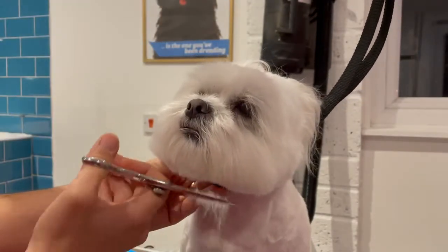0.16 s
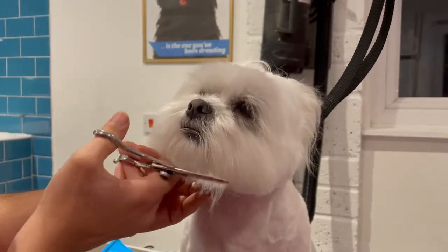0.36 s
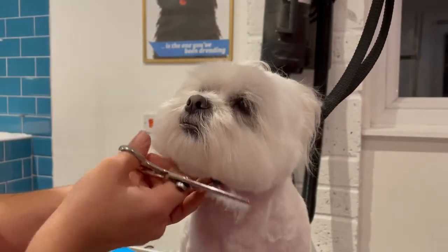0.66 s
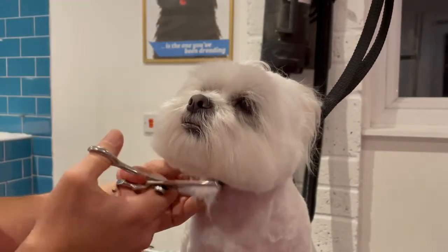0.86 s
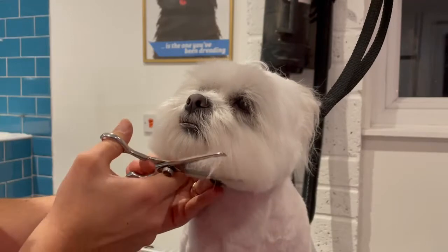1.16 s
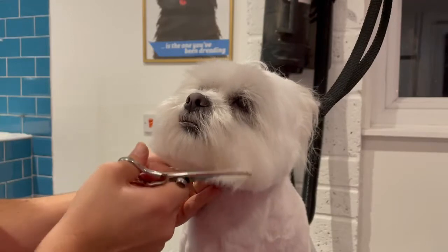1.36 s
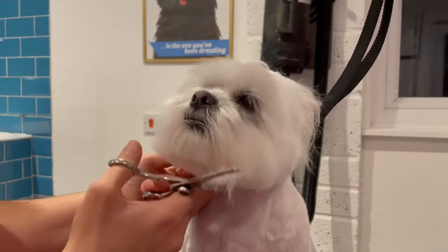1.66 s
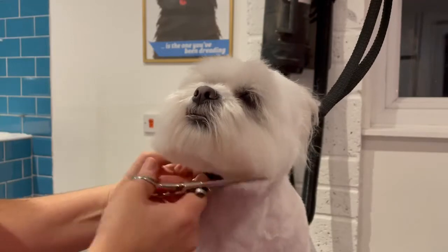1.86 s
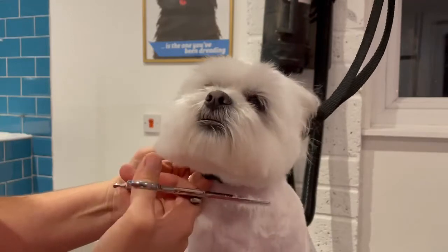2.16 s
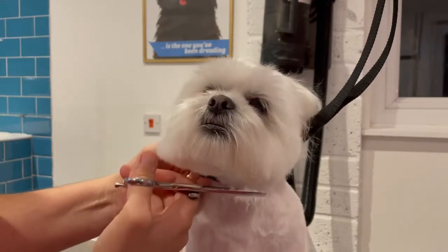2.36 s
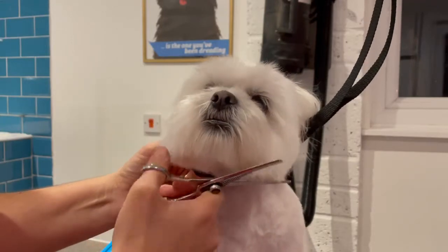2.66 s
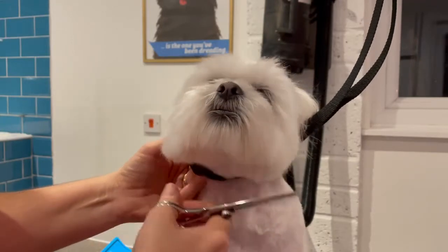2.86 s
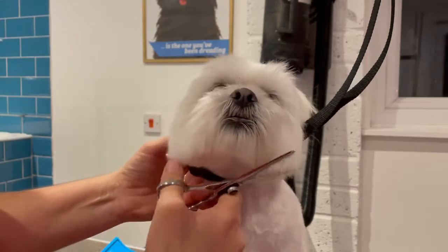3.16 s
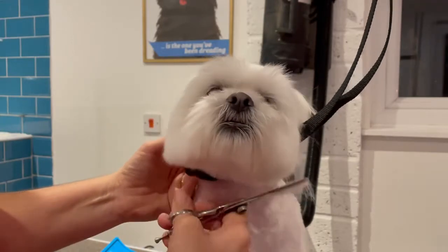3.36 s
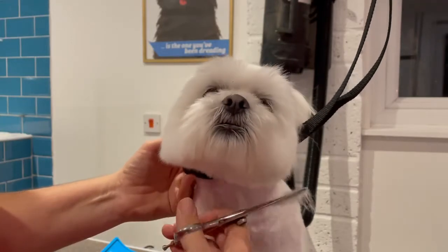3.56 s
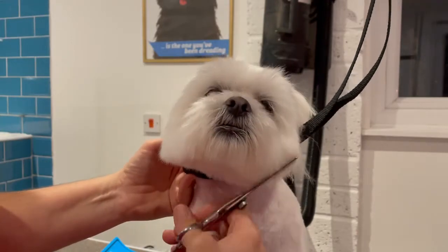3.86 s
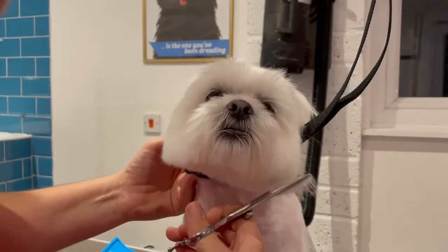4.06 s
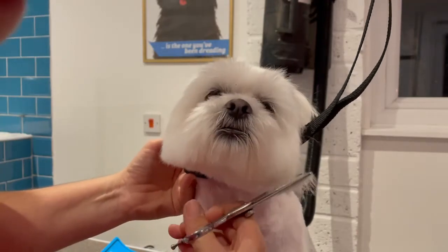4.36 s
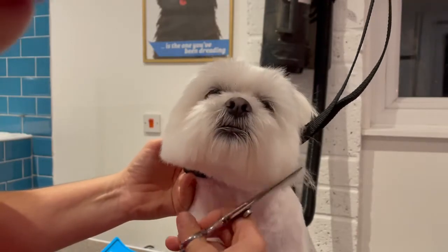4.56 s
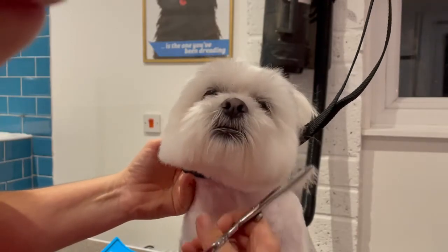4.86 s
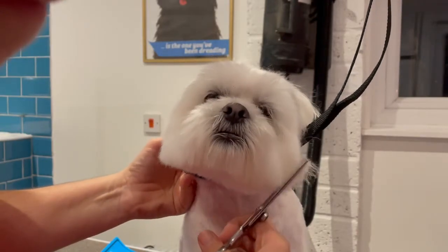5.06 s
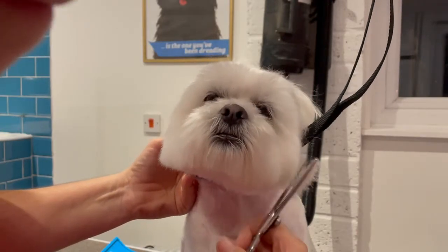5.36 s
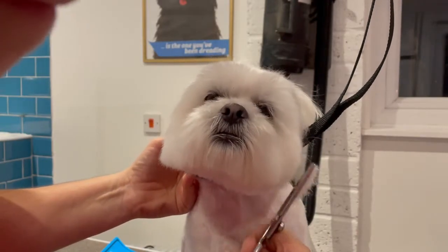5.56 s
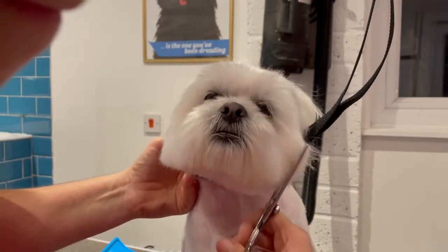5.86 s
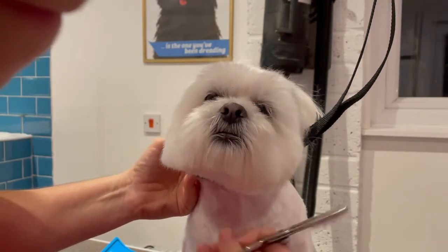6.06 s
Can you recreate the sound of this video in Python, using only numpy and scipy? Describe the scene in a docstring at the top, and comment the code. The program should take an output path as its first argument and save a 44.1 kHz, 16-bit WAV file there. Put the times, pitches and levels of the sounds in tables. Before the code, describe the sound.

Sharp, dry scissor cuts crunch through soft fur, each followed by a steely tick and rasp, over faint hand rustle and room hiss.

```python
"""Steel grooming scissors snip a small dog's chin close up: chattering, squealing edges over crackling hair.
Each cut is noise bursts and tiny fractures through blade resonances, shut by a falling noise thup. The blades
then unstick with a tick and rasp open in noise slips; a few steel ticks and clinks ring out. Soft bumps and one
sine blip pass, and hands rustle as filtered noise in the fur over rumble and hiss. A quiet tiled room adds a
decaying noise tail, and the two channels part in phase through the treble."""
import sys
import numpy as np
from scipy import signal
from scipy.fft import rfft, irfft
from scipy.io import wavfile
from scipy.ndimage import uniform_filter1d

SR = 44100
rng = np.random.default_rng(int(sys.argv[2]) if len(sys.argv) > 2 else 0)


def dump(signal):
    """Clip the signal to [-1, 1] and save it as 16-bit WAV at the path in sys.argv[1]."""
    limited = np.clip(np.atleast_2d(signal).T, -1, 1)
    pcm = np.round(limited * 32767).astype(np.int16)
    wavfile.write(sys.argv[1], SR, pcm)


N = 274302


def amp(db):
    """Turns decibels into gain."""
    return 10 ** (np.asarray(db) / 20)


def evened(x):
    """Scales to an rms of one."""
    return x / np.sqrt(np.mean(x ** 2) + 1e-20)


def read(points, hz):
    """Reads a table on a log-frequency axis."""
    f, value = np.transpose(points)
    return np.interp(np.log(hz + 1), np.log(f + 1), value)


def level(curve):
    """Gain over time from rows of t/s, level/dB."""
    return amp(np.interp(np.arange(N) / SR, *np.transpose(curve)))


def add(mix, s, sound):
    """Drops a sound into the mix at time s."""
    part = mix[max(round(s * SR), 0):][:len(sound)]
    part += sound[:len(part)]


def colour(x, points, size=4096):
    """Minimum-phase filter of unit energy: the table sets the shape of the spectrum, not its level."""
    log_gain = np.log(amp(read(points, abs(np.fft.fftfreq(size, 1 / SR)))))
    taps = np.fft.ifft(np.exp(np.conj(signal.hilbert(log_gain)))).real
    return signal.oaconvolve(x, taps / np.linalg.norm(taps))[:len(x)]


def resonate(x, hz, width):
    """A fixed or moving resonance that keeps the level of white noise."""
    turn = np.exp(2j * np.pi * np.cumsum(hz * np.ones(len(x))) / SR)
    r = np.exp(-np.pi * abs(width) / SR)
    # turn the resonance down to zero hertz, smooth there, turn it back up
    smooth = signal.lfilter([np.sqrt(2 * (1 - r * r))], [1, -r], x / turn)
    return (turn * smooth).real


def wobble(size, span):
    """Smooth random drift of rms one that changes over span samples."""
    return evened(uniform_filter1d(rng.standard_normal(size), max(int(span), 1)))


def under(envelope, texture):
    """Shapes a texture so that it carries the energy of its envelope."""
    shaped = envelope * texture
    return shaped * np.linalg.norm(envelope) / (np.linalg.norm(shaped) + 1e-20)


def peak(t, rise, fall):
    """An envelope that climbs to one at t = 0 and dies away."""
    return np.exp(np.minimum(t / rise, -t / fall))


def crackle(size, per_s, spread_db):
    """Random tiny fractures of uneven strength, rms one."""
    strength = amp(spread_db * np.minimum(rng.exponential(1, size), 3))
    sign = rng.choice([-1, 1], size)
    return evened(strength * sign * (rng.random(size) < per_s / SR))


def chatter(per_s, slip_s, jitter, drag):
    """Stick and slip of edge on edge: uneven short noise bursts over a steady drag."""
    size = len(per_s)
    turns = np.cumsum(per_s * np.exp(jitter * wobble(size=size, span=177))) / SR
    strength = amp(2 * rng.standard_normal(size))[turns.astype(int)]  # one strength for each slip
    slips = strength * np.exp(-abs(turns % 1 - .5) / (per_s * slip_s))
    return evened((drag + slips) * rng.standard_normal(size))


# Spectral shapes of fur, handling, room rumble and hiss: f/Hz, level/dB
FUR_SPECTRUM = [(100, -14), (280, -6), (500, -6.5), (1000, -2), (2300, 1.5), (3500, -4.5), (5500, -5),
                (9000, -5), (13000, -4.5), (16000, 1.5)]
HANDS_SPECTRUM = [(25, -34), (70, 4), (130, 5), (300, -4), (600, -6.5), (1200, -12.5), (2500, -19.5),
                  (5000, -34), (16000, -62)]
RUMBLE_SPECTRUM = [(20, -56.5), (33, -18.5), (47, 2), (58, -4.5), (80, -9.5), (130, -24), (300, -54.5),
                   (2000, -65)]
HISS_SPECTRUM = [(30, -5), (170, 19.5), (400, 9), (1200, 7.5), (3000, -5), (7000, -12.5), (12000, -1.5),
                 (16000, -26)]
# Level of the low rumble over time, which the steady handling follows: t/s, level/dB
RUMBLE_LEVEL = [(0, -78.5), (1.3, -71), (2.1, -64), (2.7, -60), (3.3, -57), (4.2, -60.5), (6.22, -60)]
# The hands shift their hold on the dog: middle t/s, half length/s, fur brushing level/dB, dull handling level/dB
HAND_SHIFTS = [(0.066, 0.2, -51.5, -62), (0.413, 0.14, -63, -101), (0.747, 0.088, -61.5, -92),
               (1.0, 0.1, -62.5, -80), (2.007, 0.11, -64.5, -72), (2.43, .15, -92, -62),
               (4.924, 0.21, -63, -64), (6.1, 0.095, -52, -59.5)]
FUR_REST_DB, FUR_UNEVEN_DB, HISS_DB = -71, 3, -74  # resting fur, its unevenness, hiss
STRANDS_DB, STRANDS_PER_S, STRAND_SPREAD_DB = -9, 400, 4  # single strands flick; level re the fur
HOLD_DB, FIDGET_DB = -6, 2.5  # steady handling re the rumble, and the unevenness of all handling
SWISH_DB, RUB_DB = -10.5, -3.5  # thin swish and hollow rub of a shift, re its dull handling


def noise_pair(points, apart):
    """Two channels of coloured noise: a shared part, and a part of opposite sign that widens it."""
    shared, own = (colour(rng.standard_normal(N), points) for _ in range(2))
    return evened(np.array([shared + apart * own, shared - apart * own]))


def background():
    """Each shift of the hands brushes fur and rustles dully, over steady handling noise, room rumble and hiss."""
    t, brush, handle = np.arange(N) / SR, np.zeros(N), np.zeros(N)
    for s, half, fur_db, hand_db in HAND_SHIFTS:
        move = np.exp(-((t - s) / half) ** 2)
        brush += amp(fur_db) * move
        handle += amp(hand_db) * move
    low = level(RUMBLE_LEVEL)
    fidget = amp(FIDGET_DB * wobble(size=N, span=1400))
    strands = colour(crackle(size=N, per_s=STRANDS_PER_S, spread_db=STRAND_SPREAD_DB), FUR_SPECTRUM)
    fur = noise_pair(FUR_SPECTRUM, apart=0.78) + amp(STRANDS_DB) * strands
    rest = amp(FUR_REST_DB + FUR_UNEVEN_DB * wobble(size=N, span=1300))
    fur = fur * np.hypot(brush, rest)
    swish = resonate(rng.standard_normal(N), hz=2420, width=320) * handle * amp(SWISH_DB)
    rub = resonate(rng.standard_normal(N), hz=300, width=150) * handle * fidget * amp(RUB_DB)
    hands = noise_pair(HANDS_SPECTRUM, apart=0.46) * np.hypot(handle, low * amp(HOLD_DB)) * fidget
    rumble = noise_pair(RUMBLE_SPECTRUM, apart=0.065) * low
    hiss = noise_pair(HISS_SPECTRUM, apart=0.55) * amp(HISS_DB)
    return fur + swish + rub + hands + rumble + hiss


# Time each band of the room takes to die by 60 dB: f/Hz, decay/s
ROOM_DECAY = [(200, 0.28), (1000, 0.42), (3500, 0.4), (8000, 0.39), (15000, 0.37)]
# Tone of the tail, before its overall level is set: f/Hz, level/dB
ROOM_TONE = [(120, 1), (500, 13), (2600, 6.5), (3600, -7.5), (4600, 8), (7000, 8.5), (11000, 5),
             (15000, -4)]


def room(x, wet_db, early_db):
    """Near reflections from dog and hands, then a tail in which each band dies at its own speed."""
    size = SR * 3 // 4
    taps = rng.standard_normal((2, size)) * (rng.random((2, size)) < .15)  # sparse echoes
    hz, t, z = signal.stft(taps, SR, nperseg=256)
    tail_db = read(ROOM_TONE, hz)[:, None] - 60 * t / read(ROOM_DECAY, hz)[:, None]
    tail = signal.istft(z * amp(tail_db), SR, nperseg=256)[1][:, :size]
    t = np.arange(size) / SR
    tail = tail * (1 - np.exp(-t / 0.00026))
    early = rng.standard_normal((2, size)) * np.exp(-t / 0.002) * (1 - np.exp(-t / 0.00014))
    echo = np.zeros((2, size))
    for db, part in [(wet_db, tail), (early_db, early)]:
        echo += amp(db) * part / np.linalg.norm(part, axis=1, keepdims=True)
    return signal.fftconvolve(x[None], echo, axes=1)[:, :N]


BLIP_S, BLIP_DB, BLIP_DECAY_S = 1.2465, -47, .009
BLIP_FROM_HZ, BLIP_TO_HZ, BLIP_GLIDE_S = 1200, 130, .0035


def blip():
    """A soft, quickly damped sine blip whose pitch drops at once."""
    t = np.arange(SR // 10) / SR
    hz = BLIP_TO_HZ + (BLIP_FROM_HZ - BLIP_TO_HZ) * np.exp(-t / BLIP_GLIDE_S)
    tone = np.sin(2 * np.pi * np.cumsum(hz) / SR)
    out = np.zeros(N)
    add(out, BLIP_S, amp(BLIP_DB) * np.exp(-t / BLIP_DECAY_S) * tone)
    return out


# Soft bumps of hand and handles: t/s, level/dB, decay/s, upper edge f/Hz
HAND_BUMPS = [(.535, -52, 0.0024, 930), (2.738, -57, 0.029, 750), (3.255, -55, 0.012, 700),
              (3.986, -48.5, 0.012, 167), (4.908, -45, 0.009, 247), (4.986, -38.5, 0.0022, 2780),
              (4.991, -48, 0.018, 910), (6.130, -54.5, 0.039, 780), (6.160, -46, 0.032, 185)]


def bumps():
    """Dull, damped knocks of the hands and the padded handles: band-limited noise that dies fast."""
    out, t = np.zeros(N), np.arange(SR // 4) / SR
    for s, db, decay, edge_hz in HAND_BUMPS:
        band = [70, np.clip(edge_hz, 100, 9000)]
        dull_band = signal.butter(2, band, "band", fs=SR, output="sos")
        dull = evened(signal.sosfilt(dull_band, rng.standard_normal(len(t))))
        add(out, s, amp(db) * dull * np.exp(-t / decay) * (1 - np.exp(-t / 0.00069)))
    return out


# Light metal-on-metal clinks: t/s, level/dB (drives both ring and strike)
STEEL_CLINKS = [(1.999, -65), (2.204, -62.5), (2.405, -66.5), (2.756, -63), (3.139, -68), (4.102, -67.5),
                (4.615, -66), (4.987, -68.5), (5.56, -64)]
# Modes the loose steel rings with: f/Hz, level/dB, width/Hz
STEEL_MODES = [(2428, -12, 55), (4490, -4.5, 130), (5340, -12, 140), (5720, -6, 210), (6440, -11, 250),
               (9180, -2, 160), (9350, 1.5, 680)]
CONTACT_S, STRIKE_S = 0.0063, 0.0013  # decays of the rattling contact and of its first strike
RING_DB, STRIKE_DB = -5, 17.5  # gains of ring and strike


def clinks():
    """A sharp strike and a short rattling contact set damped steel ringing, a little differently each time."""
    out, t = np.zeros(N), np.arange(SR // 3) / SR
    for s, db in STEEL_CLINKS:
        rattle, grit = rng.standard_normal((2, len(t)))
        contact = np.exp(-t / CONTACT_S) * rattle
        ring = np.zeros(len(t))
        for hz, mode_db, width in STEEL_MODES:
            mode = resonate(resonate(contact, hz, width), hz, 1500)
            ring += amp(mode_db) * evened(mode)
        strike = amp(STRIKE_DB) * resonate(np.exp(-t / STRIKE_S) * grit, hz=7160, width=5300)
        add(out, s, amp(db) * (amp(RING_DB) * ring + strike))
    return out


# Opening strokes, a tick and then a rasp: t/s, tick level/dB, pause/s, rasp length/s, rasp level/dB
OPENING_STROKES = [(.742, -29.5, 0.018, 0.052, -43.5), (1.477, -40, 0.0043, 0.086, -47.5),
                   (1.956, -31.5, 0.01, 0.073, -45.5), (2.895, -28.5, 0.013, 0.064, -44),
                   (3.434, -28, 0.014, 0.065, -45), (3.97, -32, 0.001, 0.034, -41),
                   (4.683, -26, .014, 0.053, -42.5), (5.139, -31.5, 0.012, 0.019, -34),
                   (5.636, -28.5, 0.0041, 0.07, -43), (6.042, -29.5, 0.021, 0.089, -50)]
# Sharp ticks of steel catching on steel: t/s, level/dB, decay/s
STEEL_TICKS = [(0.537, -28, 0.00067), (1.016, -38.5, 0.00047), (3.427, -39, 0.0013), (3.715, -30, 0.0011),
               (3.9733, -25, 0.0011), (4.6917, -19, 0.0005), (4.911, -37, 0.00088),
               (4.9876, -18.5, 0.00038), (6.056, -26, 0.0013), (6.126, -25, 0.00054)]
# Spectral shape of bare edges rubbing: f/Hz, level/dB
EDGE_SPECTRUM = [(300, -23.5), (2000, -34.5), (3500, -28), (5500, -15.5), (8500, -2.5), (10200, -1.5),
                 (12500, -0.5), (14100, -8), (15200, -15), (16000, 6)]
LEAD_IN_DB, LEAD_IN_SLIPS_PER_S, SPEED_UP_S = -46.5, 380, .08  # slip rate reached at the end of the lead-in
UNSTICK_RISE_S, UNSTICK_DECAY_S, TICK_BODY_DB = 0.0013, 0.001, -25  # body: ring of the blades in a tick
SLIPS_PER_S, SLIPS_SLOW_S, SCRAPE_S = 300, 0.082, 0.028
SQUEAK_DB, SQUEAK_HZ, SQUEAK_CLIMB_HZ, SQUEAK_CLIMB_S = -3, 10060, 1220, 0.011  # level re the rasp's slips
RASP_RING_DB, RASP_RING_HZ = -22, 6000  # the blades ring under the rasp


def edges():
    """Bare edges rub before each cut; on opening they unstick with a tick and rasp in slips that slow down."""
    rub, whine, t = np.zeros(N), np.zeros(N), np.arange(SR // 8) / SR
    before = t - t[-1]
    for s, _, lead_s, *_ in CLOSING_STROKES:
        rate = LEAD_IN_SLIPS_PER_S * np.exp(before / SPEED_UP_S)
        slips = chatter(rate, slip_s=.0007, jitter=.15, drag=.15)
        lead = under(amp(LEAD_IN_DB) * np.exp(before / lead_s), slips)
        add(rub, s + 0.0019 - t[-1], resonate(lead, hz=15000, width=13000))
    t = t - .015  # room for the attacks before t = 0
    for s, tick_db, pause, length, db in OPENING_STROKES:
        tick = amp(tick_db) * peak(t, UNSTICK_RISE_S, UNSTICK_DECAY_S)
        add(rub, s + t[0], under(tick, rng.standard_normal(len(t))))
        force = amp(db) * (1 + np.tanh(t / 0.004)) / 2 * np.exp(-2 * (t / length) ** 2)
        # a steady scrape at first, breaking into separate slips
        rate = SLIPS_PER_S * np.exp(-t / SLIPS_SLOW_S)
        slips = chatter(rate, slip_s=.0006, jitter=.22, drag=.15 + .6 * np.exp(-t / SCRAPE_S))
        # the squeak climbs as the blades open
        squeak_hz = SQUEAK_HZ + SQUEAK_CLIMB_HZ * np.tanh((t / SQUEAK_CLIMB_S) ** 2)
        squeak = resonate(slips, squeak_hz * rng.uniform(.98, 1.04), width=350)
        start = s + pause + t[0]
        add(rub, start, under(force, slips + amp(SQUEAK_DB) * squeak))
        add(whine, start, under(amp(-6) * force, resonate(slips, hz=15300, width=700)))
        add(whine, start, under(amp(RASP_RING_DB) * force, resonate(slips, RASP_RING_HZ, width=800)))
    for s, db, decay in STEEL_TICKS:
        tick = under(amp(db) * peak(t, decay / 2, decay), rng.standard_normal(len(t)))
        add(rub, s + t[0], tick)
        add(whine, s + t[0], amp(TICK_BODY_DB) * resonate(tick, hz=5100, width=430))
    return colour(rub, EDGE_SPECTRUM) + whine


THUP_LEAD_S, THUP_RISE_S, THUP_FALL_S = 0.0056, 0.011, 0.0078  # lead: peak of the thup before the stroke's end
THUP_END_SHARE, THUP_GLIDE_S = 0.65, 0.0017  # the pitch falls to this share of its start
FLEX_DB, HUM_DB, HUM_DECAY_S = -2.5, -9, 0.056  # levels re thup
GRIP_DB, GRIP_DELAY_S = -2.5, .008  # level re thup


def thups():
    """The blades shut with a falling thup, flex and hum on; the hand takes up the handles a moment later."""
    out, t = np.zeros(N), np.arange(SR // 4) / SR - .07  # t = 0 at the end of the stroke
    for s, length, *_, db, hz in CLOSING_STROKES:
        start = s + length + t[0]
        press = amp(db) * peak(t + THUP_LEAD_S, THUP_RISE_S, THUP_FALL_S) * (t > -length)
        fall = THUP_END_SHARE + (1 - THUP_END_SHARE) * (1 - np.tanh(t / THUP_GLIDE_S / 2)) / 2
        decay = np.exp(-np.maximum(t, 0) / HUM_DECAY_S)
        linger = amp(db + HUM_DB) * decay * (1 + np.tanh(t / 0.0018)) / 2
        thup, flex, hum, grip = rng.standard_normal((4, len(t)))
        add(out, start, under(press, resonate(thup, hz * fall, width=163)))
        add(out, start, under(amp(FLEX_DB) * press, resonate(flex, hz=3500, width=600)))
        uneven_hum = resonate(hum, hz=3620, width=420) * amp(3 * wobble(size=len(t), span=400))
        add(out, start, under(linger, uneven_hum))
        add(out, start + GRIP_DELAY_S, under(amp(GRIP_DB) * press, resonate(grip, hz=274, width=420)))
    return out


# Squeals of the edges as they meet the hair: t/s, level/dB
EDGE_SQUEALS = [(.498, -53), (1.757, -41), (2.716, -41.5), (3.222, -37), (3.749, -39.5), (4.940, -39),
                (5.439, -43), (5.831, -43)]
SQUEAL_HZ, SQUEAL_CLIMB_HZ, SQUEAL_SAG_HZ = 11200, 1650, 750  # base pitch, climb above it, final sag below it
SQUEAL_TOP_S, SQUEAL_JITTER_HZ = .0095, 480  # top: how long before the hair the climb peaks, and its width
SQUEAL_RISE_S, SQUEAL_FALL_S = 0.0043, 0.0048
SQUEAL_CHATTER_DB, SQUEAL_CHATTER_S = -17.5, 0.025  # lead-in re the squeal, and its rise


def squeals():
    """Edge on edge: thin chatter climbs in pitch as the blades speed up, then swoops down as they meet the hair."""
    out, t = np.zeros(N), np.arange(SR // 8) / SR - .09  # t = 0 at the hair
    climb = SQUEAL_CLIMB_HZ * np.exp(-((t + SQUEAL_TOP_S) / SQUEAL_TOP_S) ** 2)
    sag = SQUEAL_SAG_HZ * (1 + np.tanh(t / .004)) / 2
    hz = SQUEAL_HZ + climb - sag
    force = peak(t, SQUEAL_RISE_S, SQUEAL_FALL_S)
    force = force + amp(SQUEAL_CHATTER_DB) * peak(t, SQUEAL_CHATTER_S, SQUEAL_FALL_S)
    chatter_depth = (1 - np.tanh((t + SQUEAL_TOP_S) / .005)) / 2  # fades out into the steady squeal
    for s, db in EDGE_SQUEALS:
        speed = np.exp(t / SPEED_UP_S + .1 * wobble(size=len(t), span=210))
        turns = np.cumsum(LEAD_IN_SLIPS_PER_S * speed) / SR
        slips = 1 + np.cos(2 * np.pi * turns) * chatter_depth
        pitch = hz * rng.uniform(.98, 1.02) + SQUEAL_JITTER_HZ * wobble(size=len(t), span=14)
        tone = np.sin(2 * np.pi * np.cumsum(pitch) / SR)
        add(out, s + t[0], under(amp(db) * force, slips * tone))
    return out


# Closing strokes, whose lead-in and thup also drive edges() and thups(): t/s, time in the hair/s,
# lead-in chatter/s, crunch level/dB, thickest tuft t/s, tuft level/dB, bite of the tips level/dB,
# blade ring level/dB re crunch, thup level/dB, starting thup f/Hz
CLOSING_STROKES = [(.497, 0.042, 0.03, -49, .513, -42.5, -57, 0.5, -69.5, 850),
                   (1.257, 0.042, 0.036, -42, 1.282, -37, -25.5, 1, -51, 1430),
                   (1.759, 0.037, 0.019, -42.5, 1.778, -37, -23, -1, -50.5, 1330),
                   (2.713, 0.031, 0.032, -40, 2.722, -36.5, -34.5, -5.5, -51.5, 655),
                   (3.219, 0.044, 0.036, -38, 3.232, -37, -28, -7.5, -52.5, 634),
                   (3.738, .046, 0.02, -45, 3.752, -38.5, -48.5, -7.5, -63.5, 1400),
                   (4.504, 0.047, 0.02, -34.5, 4.536, -31, -31, -12, -48, 1380),
                   (4.926, 0.045, 0.01, -40, 4.946, -36, -34, -8, -57.5, 1100),
                   (5.437, 0.036, 0.014, -33, 5.451, -31.5, -37, -10.5, -49.5, 1580),
                   (5.827, 0.044, 0.021, -36.5, 5.850, -28.5, -27.5, -6, -48, 1590)]
# Spectral shape of hair being cut: f/Hz, level/dB
HAIR_SPECTRUM = [(200, -42), (1500, -15), (2500, -21.5), (3500, -12), (4700, -34), (6000, -18.5),
                 (8000, 7.5), (9500, -1), (10900, 4.5), (12200, -5), (13300, 6), (14500, -8), (16000, -7)]
ENTER_S, SHUT_S, SWELL_DB = 0.0075, 0.0045, -5  # swell: change of crunch level over the stroke
BREAKS_PER_S, BREAK_SPREAD_DB, LUMPS_DB = 4500, 5, 2.8  # lumps: unevenness of the crunch
BANDS_DB = -7  # sliding bands re the crunch
TUFT_HALF_S, BITE_SLIPS_PER_S = .0028, 650  # the blades judder through thick hair
BITE_LEAD_S, BITE_RISE_S, BITE_FALL_S = 0.01016, 0.002, 0.0044  # lead: bite before the stroke's end


def snips():
    """The crossing point runs down the blades and breaks hairs, through one thick tuft to a last bite at the tips."""
    hair, body, t = np.zeros(N), np.zeros(N), np.arange(SR // 4) / SR - .02  # t = 0 at the hair
    for s, length, _, db, tuft_s, tuft_db, bite_db, ring_db, *_ in CLOSING_STROKES:
        start = s + t[0]
        late, closed = t - length, np.clip(t / length, 0, 1)
        stroke = (1 + np.tanh(t / ENTER_S)) * (1 - np.tanh(late / SHUT_S)) / 4
        force = amp(db + SWELL_DB * closed) * stroke
        lumps = amp(LUMPS_DB * wobble(size=len(t), span=89))
        breaks = lumps * crackle(size=len(t), per_s=BREAKS_PER_S, spread_db=BREAK_SPREAD_DB)
        # the free length of blade changes: bands slide differently in each stroke
        bands = np.zeros(len(t))
        for hz, glide in zip(rng.uniform(10000, 13800, size=3), rng.normal(-2, 3, size=3)):
            bands += resonate(breaks, hz * np.exp(glide * t), width=72)
        add(hair, start, under(force, breaks + amp(BANDS_DB) * bands))
        ring = resonate(breaks, hz=7600 * np.exp(late), width=620)  # climbs through the stroke
        add(body, start, under(amp(ring_db) * force, ring))
        tuft = amp(tuft_db) * peak(s + t - tuft_s, TUFT_HALF_S, TUFT_HALF_S)
        bite = amp(bite_db) * peak(late + BITE_LEAD_S, BITE_RISE_S, BITE_FALL_S)
        judder = chatter(np.full(len(t), BITE_SLIPS_PER_S), slip_s=.00025, jitter=.3, drag=.25)
        burst = under(tuft + bite, judder)
        add(hair, start, burst)
        add(body, start, amp(-17.5) * resonate(burst, hz=7500, width=810))
    return colour(hair, HAIR_SPECTRUM) + body


# Lean of the whole image, left over right: f/Hz, level/dB
LEFT_LEAN = [(60, 0.5), (250, 0), (700, 5), (1400, 2.5), (3300, 3.5), (6000, 2.5), (8000, 0)]


def scene():
    """The scissors and hands in their room, a little to the left."""
    close = snips() + squeals() + thups() + edges() + bumps() + blip()
    steel = clinks()
    close_room = room(close, wet_db=-7.5, early_db=-2.0)
    steel_room = room(steel, wet_db=0.0, early_db=-20)
    sound = close + close_room + steel + steel_room + background()
    lean_db = read(LEFT_LEAN, np.fft.rfftfreq(N, 1 / SR))
    return irfft(rfft(sound) * amp(np.array([lean_db, -lean_db]) / 2), N)


# Phase by which the left channel lags the right: f/Hz, lag/rad
LEFT_LAG = [(6200, 0), (6800, 1), (7670, 3.05), (8700, 3.25), (10700, 6.1), (12200, 6.4), (14100, 9.2),
            (16000, 9.6)]
EDGE_HZ = 16100  # upper band limit


def record(dry):
    """Above 6 kHz the two channels turn apart in phase through the treble; then the band limit."""
    hz = np.fft.rfftfreq(N, 1 / SR)
    (left, right), lag = rfft(dry), read(LEFT_LAG, hz)
    # the stereo width above 6.8 kHz varies with the phase lag: narrow near whole half-turns, wide between
    width = np.maximum(abs(np.sin(lag)), hz < LEFT_LAG[1][0])
    mid, side = (left + right) / 2, width * (left - right) / 2
    lagged_left = (mid + side) * np.exp(-.5j * lag)
    leading_right = (mid - side) * np.exp(.5j * lag)
    ports = irfft(np.array([lagged_left, leading_right]), N)
    low_pass = signal.firwin(511, EDGE_HZ, window=("kaiser", 9), fs=SR)
    return signal.oaconvolve(ports, low_pass[None], "same")


dry = scene()
out = record(dry)
dump(out)
```